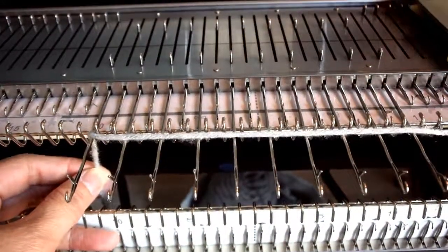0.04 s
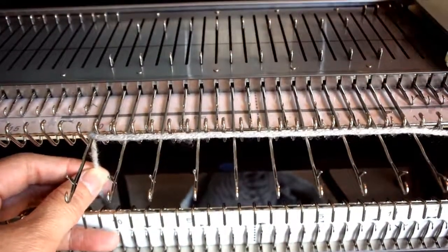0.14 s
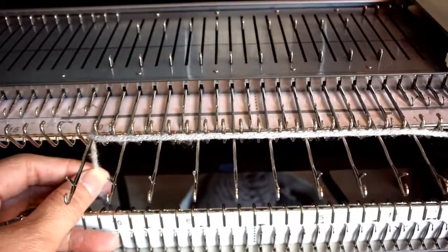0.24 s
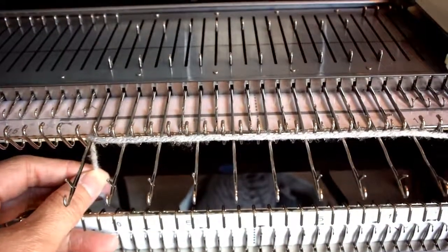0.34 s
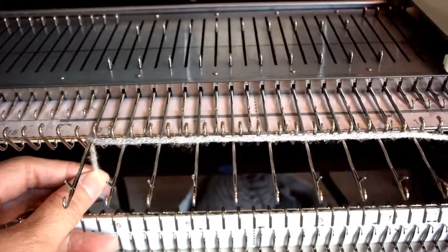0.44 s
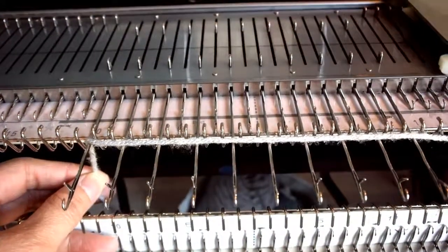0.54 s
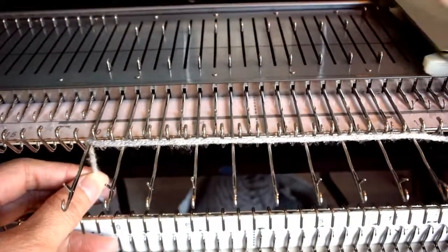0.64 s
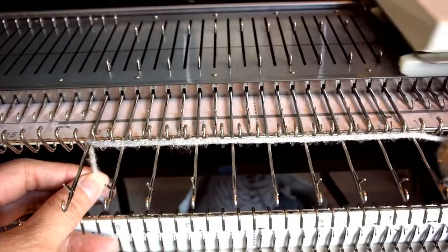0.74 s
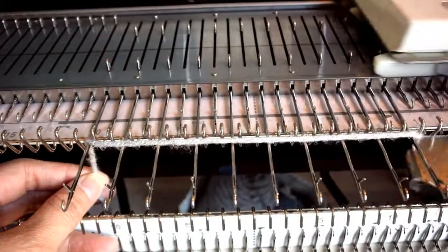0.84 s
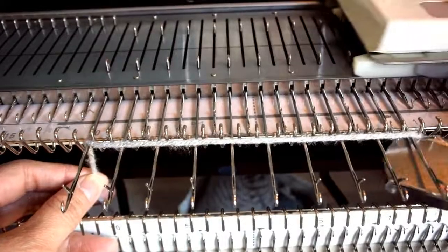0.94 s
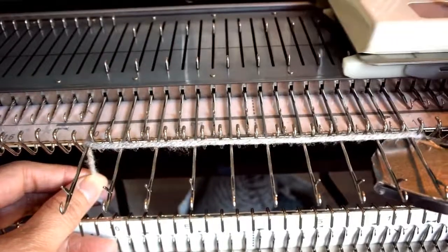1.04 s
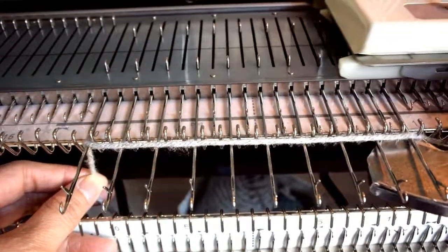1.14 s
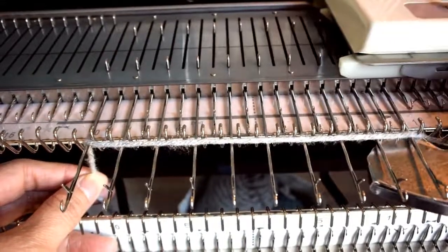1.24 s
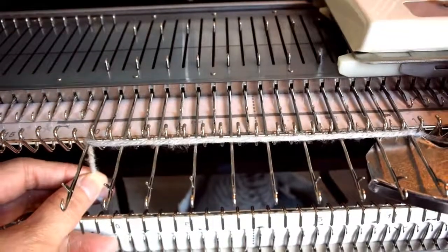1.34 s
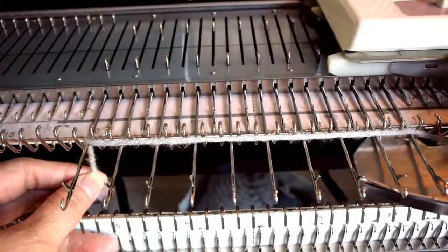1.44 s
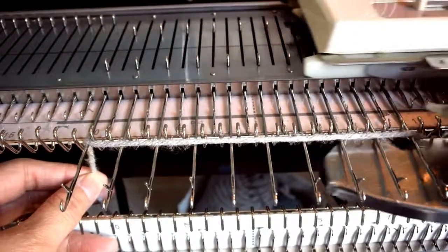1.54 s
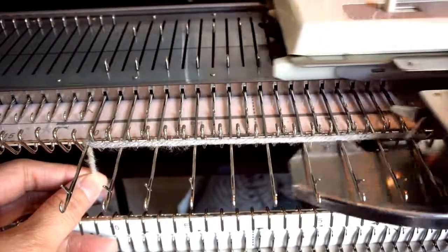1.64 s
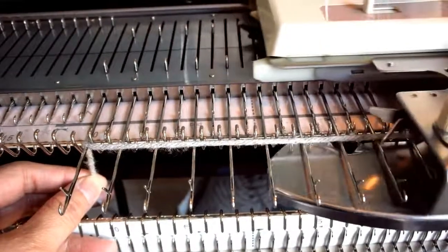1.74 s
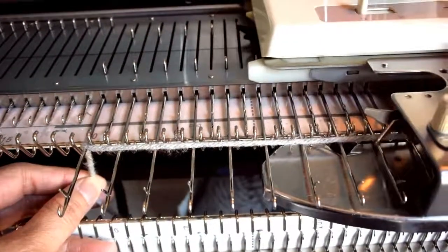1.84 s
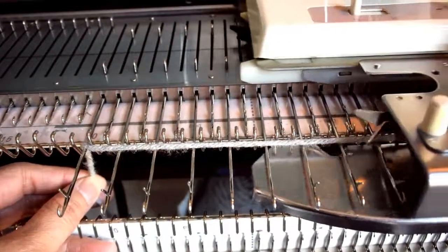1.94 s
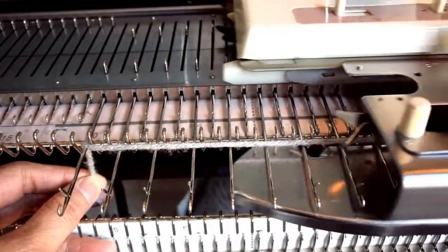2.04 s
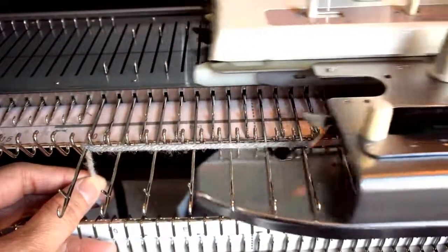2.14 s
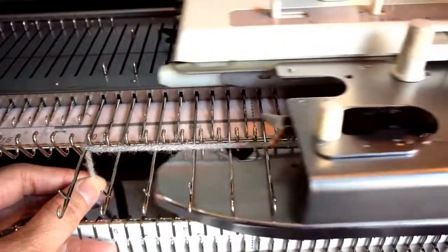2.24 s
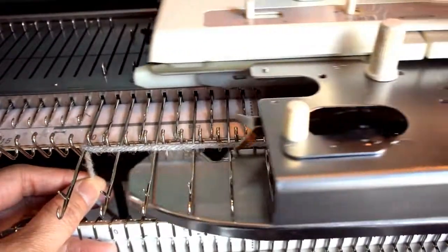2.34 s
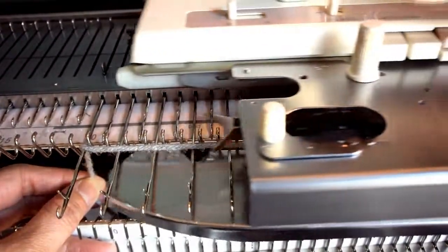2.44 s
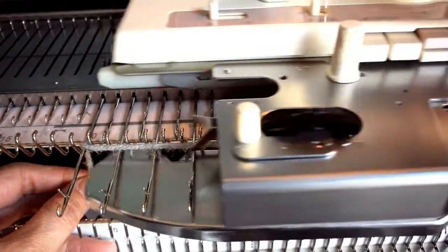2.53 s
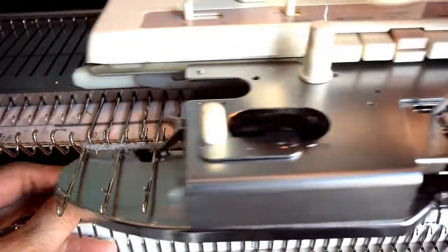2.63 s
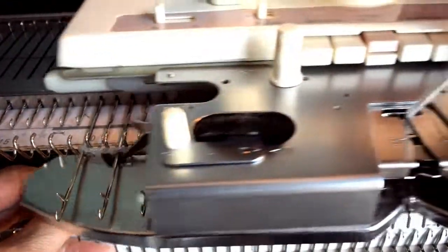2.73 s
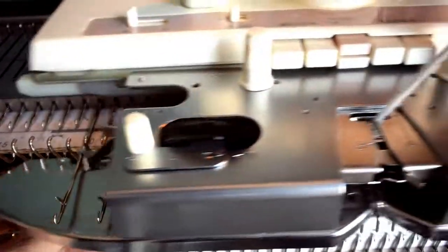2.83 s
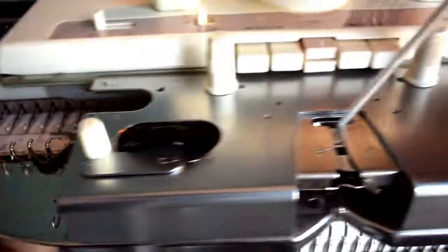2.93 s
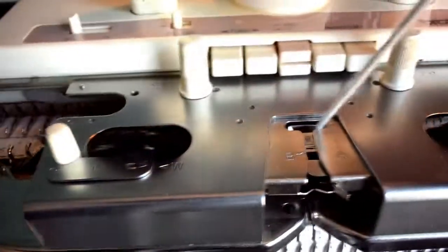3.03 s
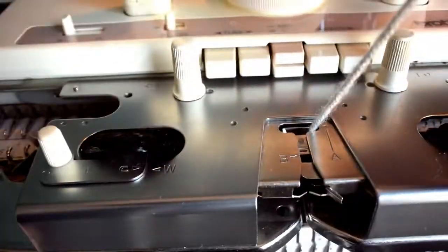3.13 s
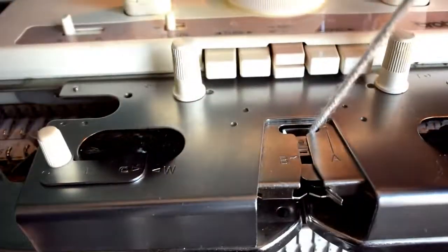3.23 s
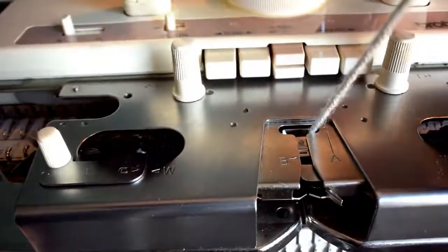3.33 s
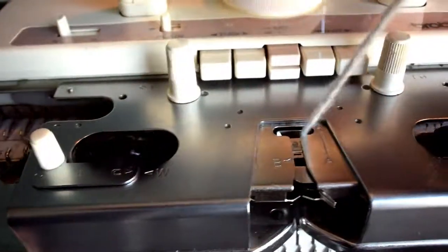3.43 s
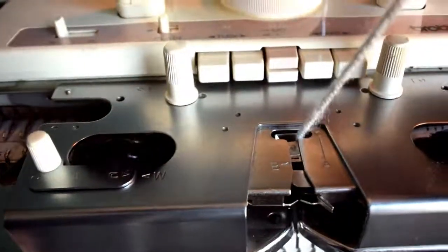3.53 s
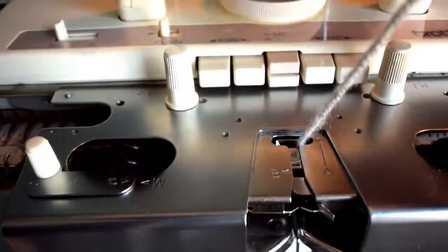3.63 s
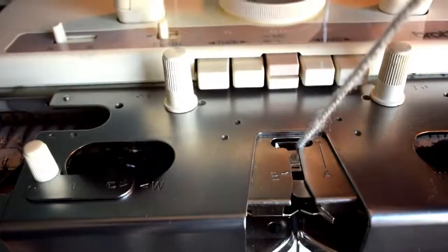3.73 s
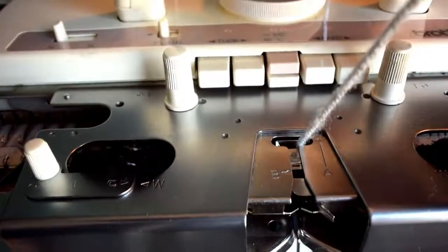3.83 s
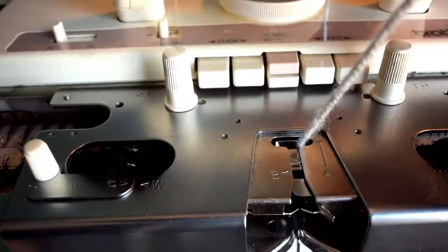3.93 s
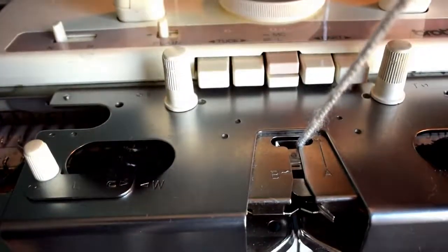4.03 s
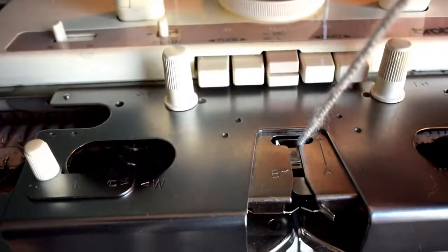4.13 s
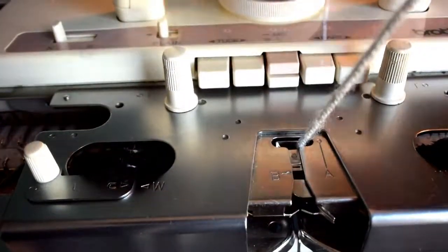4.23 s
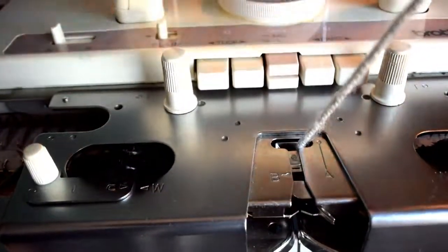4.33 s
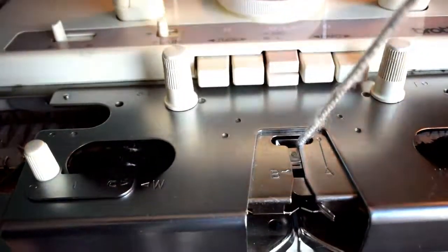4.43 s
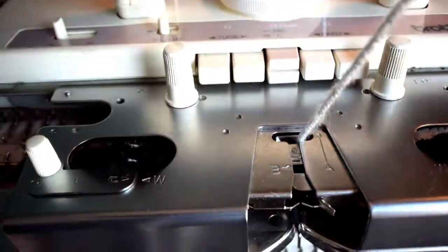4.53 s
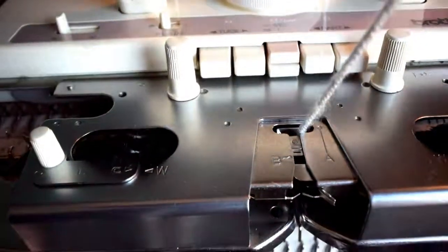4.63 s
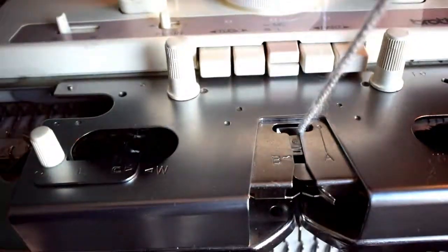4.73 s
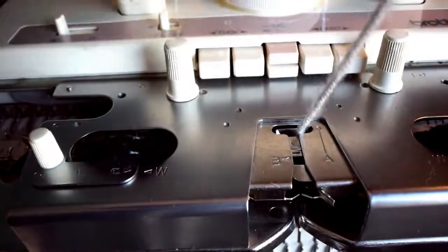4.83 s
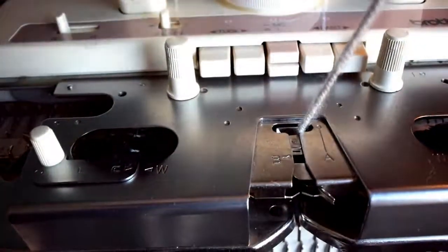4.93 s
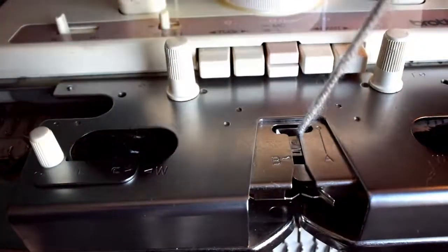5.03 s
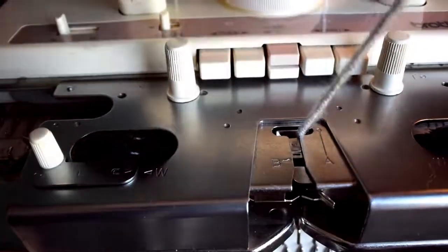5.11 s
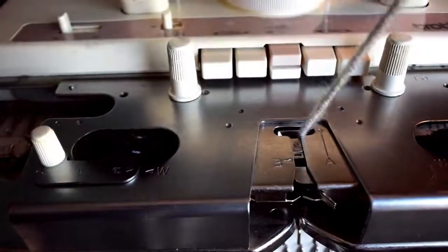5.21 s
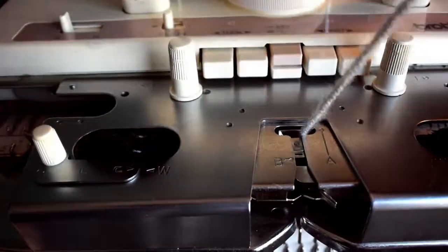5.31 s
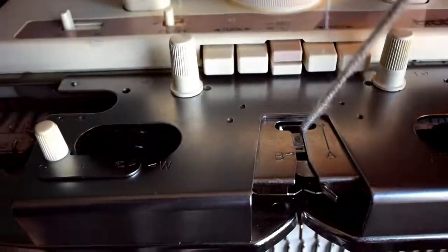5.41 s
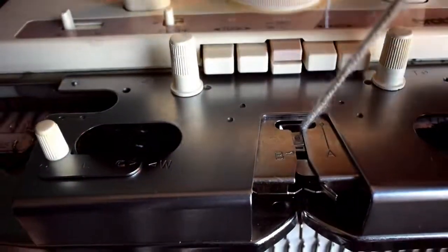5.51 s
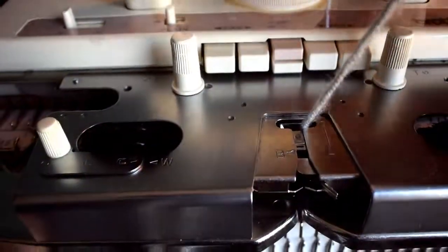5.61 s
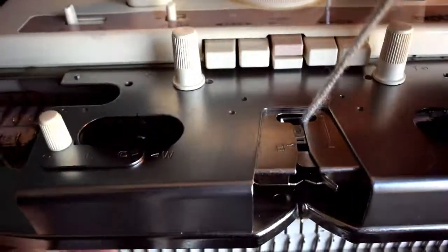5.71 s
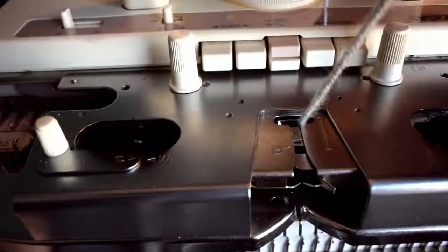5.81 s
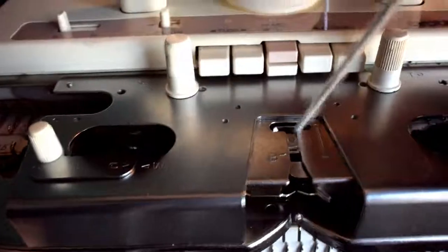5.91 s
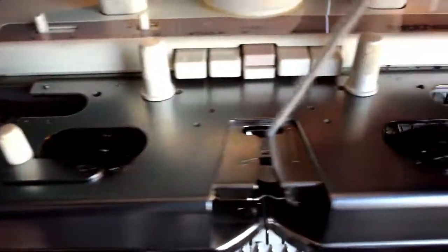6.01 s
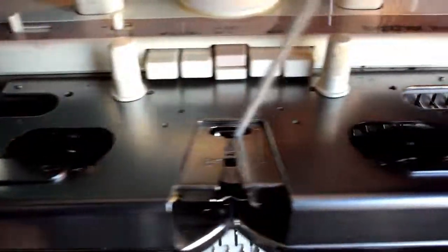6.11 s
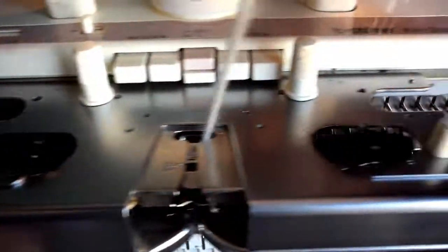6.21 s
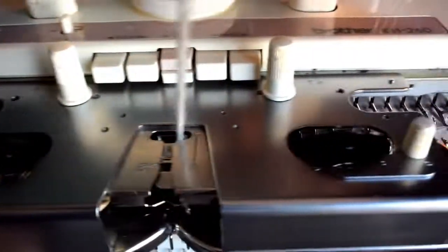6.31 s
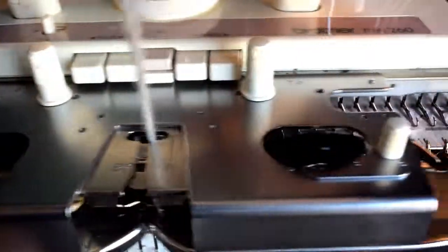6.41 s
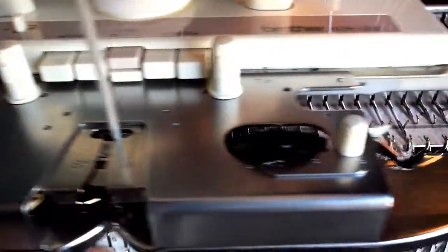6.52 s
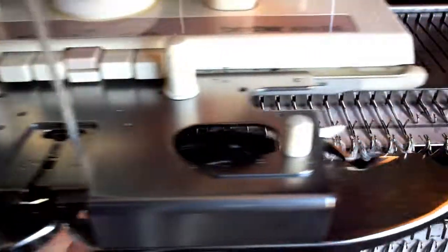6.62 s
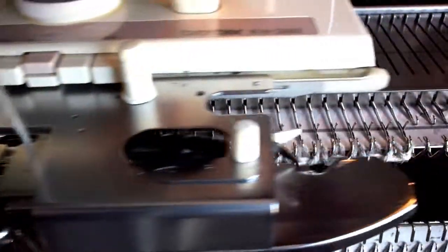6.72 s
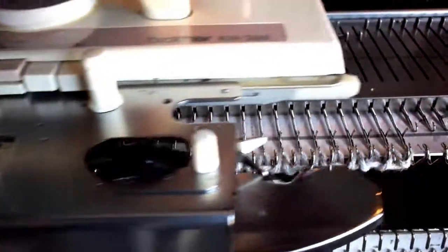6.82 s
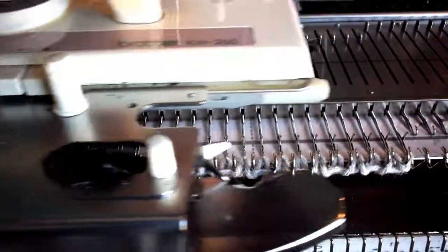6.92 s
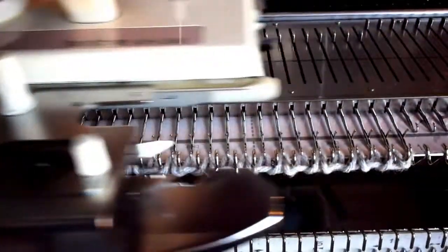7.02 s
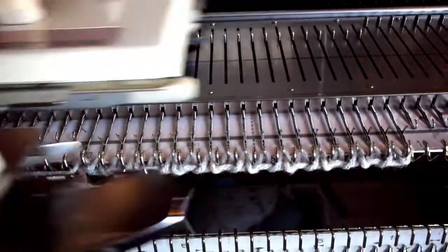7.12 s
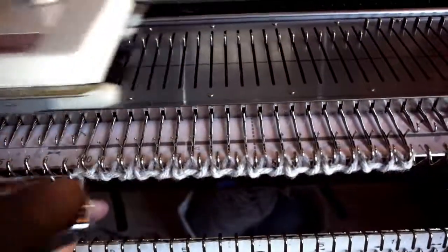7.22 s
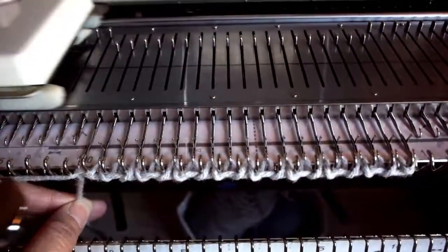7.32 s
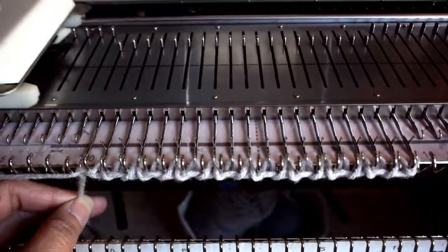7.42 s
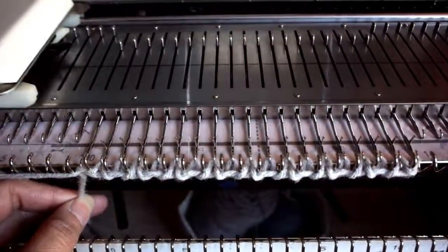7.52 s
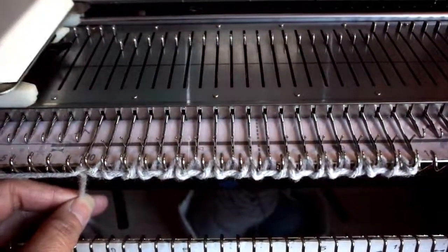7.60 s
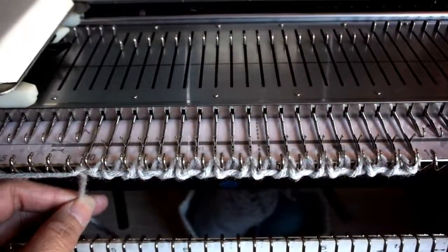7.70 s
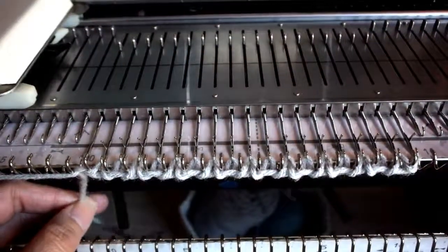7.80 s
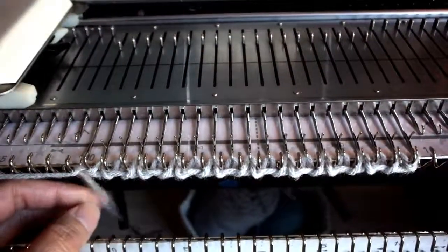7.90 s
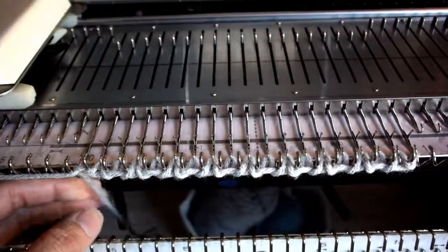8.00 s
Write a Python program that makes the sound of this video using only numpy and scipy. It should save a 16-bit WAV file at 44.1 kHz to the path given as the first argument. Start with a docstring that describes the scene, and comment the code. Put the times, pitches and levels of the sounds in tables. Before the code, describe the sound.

Close up in a small room, a knitting machine carriage starts with a few faint cam clicks and short shoves, then rattles along the steel bed, needles snapping rapidly. It stops; soft handle knocks, a thin ringing yarn rub and a tiny spring buzz follow. A small shove, then a louder, faster clattering pass back, ending in sharp clacks and faint room noise.

```python
"""Close stereo pair on a hand-pushed knitting machine in a small room, over faint steady room noise.
Cam clicks and short shoves lead to a long pass along the steel bed: needles snap through the cams as
bursts of noise with ringing partials, over latch rattle and rail rumble made from many tiny impacts.
The carriage rests: soft knocks ring damped handle modes, yarn rubs a wire as resonant noise, then a spring
buzzes. After one more shove the carriage is pulled back, snapping and clacking, and room noise remains."""
import sys
import numpy as np
from scipy import signal
from scipy.fft import rfft, irfft, next_fast_len
from scipy.io import wavfile

SR = 44100
rng = np.random.default_rng(int(sys.argv[2]) if len(sys.argv) > 2 else 0)


def store_wav(level_fs):
    """Save 16-bit WAV to argv[1]."""
    pcm = np.round(np.clip(np.atleast_2d(level_fs), -1, 1) * 32767)
    wavfile.write(sys.argv[1], SR, pcm.T.astype(np.int16))


N = 355225

# overall colour of the steel machine: [f/Hz, relative level per Hz/dB]
STEEL_COLOUR = [(30, -42), (70, -20), (125, -28), (220, -18.5), (450, -5), (650, -8), (1050, -3.5),
                (2000, -0.5), (2800, -2.5), (3700, -5), (5500, -9.5), (8300, -14), (10000, -29),
                (15500, -40.5)]
# resonances of bed and carriage: [f/Hz, width/Hz, lift/dB]
BED_RESONANCES = [(143.7, 19.6, 15.5), (296.6, 11, 8), (342.5, 5.3, 12.5), (398, 29, -6.5), (467, 23, 2.5),
                  (522, 26, 1.5), (715, 20, 11), (926, 160, 5), (1179, 20, 4.5), (1360, 17, 4),
                  (1574, 340, -2), (2970, 21, 4.5), (3400, 13, -8), (6220, 68, 6.5)]
# a needle butt rides up a cam and rings it: [t/s, relative level/dB, chatter decay/s]
CAM_HITS = [(0.0318, -41, 0.0097), (0.6007, -33.5, 0.021), (0.6864, -32.5, 0.0077), (0.7525, -29.5, .008),
            (0.8123, -29.5, 0.011), (.8749, -29.5, .006), (0.9509, -32.5, 0.0057), (1.115, -41, 0.01),
            (1.49, -31, 0.0087), (1.5548, -28.5, 0.0073), (1.6073, -27.5, 0.0046), (1.7271, -29.5, 0.0037),
            (2.0515, -29.5, 0.0062), (5.7353, -30.5, 0.001), (5.7442, -34.5, 0.0018),
            (5.7525, -28, 0.00064), (5.8166, -27, 0.00071), (5.843, -38, 0.0013), (5.8644, -23.5, 0.00067),
            (5.873, -34, .001), (7.068, -18, 0.0027), (7.089, -22.5, 0.0018), (7.128, -22, .002),
            (7.1704, -19.5, 0.0019), (7.2124, -16.5, 0.0015), (7.2585, -20.5, 0.0026),
            (7.2859, -31, 0.0054), (7.319, -26, .005), (7.3548, -22.5, .005), (7.412, -26.5, .007)]
# the long passes, out and back: [t/s, push level/dB, share of the cams filled with needles 0-1]
OUTWARD_PASS = [(2.1, -51, 0.46), (2.14, -41.5, 0.94), (2.28, -36.5, 0.87), (2.44, -41, 0.83),
                (2.55, -36, 0.9), (2.92, -35.5, 0.96), (3.02, -35.5, 0.89), (3.14, -61.5, 1),
                (3.3, -97, 0.5)]
RETURN_PASS = [(5.935, -51, 0.57), (5.979, -35.5, 0.85), (6.24, -39, 1), (6.376, -42.5, 0.62),
               (6.41, -34.5, 0.8), (6.96, -33.5, 0.73), (7.03, -39.5, 0.76), (7.22, -34.5, 0.077),
               (7.43, -46, .05), (7.64, -83, .03)]


def amp(db):
    """Decibels to gain."""
    return 10 ** (np.asarray(db) / 20)


def unit(x):
    """Scales to rms 1."""
    return x / np.sqrt(np.mean(x ** 2) + 1e-20)


def read(points, hz):
    """Reads a table along a log-frequency axis."""
    f, value = np.transpose(points)
    return np.interp(np.log(hz + 1), np.log(f), value)


def add(mix, s, sound):
    """Mixes a sound in at time s."""
    part = mix[:, round(s * SR):][:, :sound.shape[-1]]
    part += sound[..., :part.shape[-1]]


def colour(x, points, resonances=(), size=8192):
    """Causal (minimum-phase) filter: a smooth spectrum with narrow resonances standing on it."""
    hz = np.fft.rfftfreq(size, 1 / SR)
    db = read(points, hz)
    for f, width, lift in resonances:
        db = db + lift / (1 + (2 * (hz - f) / width) ** 2)
    log_gain = np.log(amp(np.r_[db, db[-2:0:-1]]))
    kernel = np.fft.ifft(np.exp(np.conj(signal.hilbert(log_gain)))).real
    kernel /= np.linalg.norm(kernel)
    return signal.oaconvolve(x, kernel[None], axes=1)[:, :x.shape[1]]


def split(x, low_hz, high_hz):
    """Bass, middle and treble of a sound."""
    bands = [(low_hz, "low"), ([low_hz, high_hz], "band"), (high_hz, "high")]
    return [signal.sosfilt(signal.butter(6, edge, kind, fs=SR, output="sos"), x) for edge, kind in bands]


def level(rows):
    """Gain over time from a dB curve, silent outside it."""
    s, db = np.transpose(rows)
    return amp(np.interp(np.arange(N) / SR, s, db, left=-np.inf, right=-np.inf))


def after(times, decay):
    """Jumps to 1 at each of the times and dies away with the decay in seconds."""
    kicks = np.bincount(np.round(np.array(times) * SR).astype(int), minlength=N)[:N]
    trail = signal.lfilter([1], [1, -np.exp(-1 / (decay * SR))], kicks + 1e-12)
    return np.minimum(trail, 1)


def room(x, wet_db, gap=0.0035, turns_per_s=2.3, count=3):
    """Sparse reflections begin after a gap (s); each band dies at its own speed and the tails take turns."""
    # decay of the small room: [f/Hz, t60/s]
    room_decay = [(120, 0.37), (320, 1), (840, 0.66), (2200, 0.41), (5800, 0.31), (14000, 0.41)]
    reflections_per_s = 4000
    out = x
    for k in range(count):
        present = rng.random((2, SR // 2)) < reflections_per_s / SR
        taps = rng.choice([-1., 1.], (2, SR // 2)) * present
        hz, t, z = signal.stft(taps, SR, nperseg=256)
        fade = amp(-60 * t / read(room_decay, hz)[:, None])
        tail = signal.istft(z * fade, SR, nperseg=256)[1]
        tail *= np.arange(tail.shape[1]) > gap * SR
        tail /= np.linalg.norm(tail[0])
        # staggered cosines keep the summed power of the tails steady
        share = np.sqrt(2 / count) * np.cos(np.pi * (2 * turns_per_s * np.arange(N) / SR + k / count))
        out = out + amp(wet_db) * signal.oaconvolve(x * share, tail, axes=1)[:, :N]
    return out


def struck(hits, modes, gain_db, rise, wet_db):
    """Every blow rings the same damped modes, in fresh phases, with a short rise (s)."""
    out, t = np.zeros((2, N)), np.arange(SR // 5) / SR
    rings = np.array([amp(db - 60 * t / t60) * np.exp(2j * np.pi * hz * t) for hz, db, t60 in modes])
    rings = rings * (1 - np.exp(-t / rise))
    for s, db in hits:
        phases = np.exp(2j * np.pi * rng.random((len(modes), 2, 1)))
        add(out, s, amp(db + gain_db) * (phases * rings[:, None]).imag.sum(0))
    return room(out, wet_db, count=2)


def room_noise():
    """Steady faint background from coloured noise, wider in the treble than in the bass."""
    # colour of the room noise: [f/Hz, relative level per Hz/dB]
    quiet_colour = [(15, -33), (25, -5), (91, -16.5), (122, -1.5), (148, -13.5), (233, -4.5), (378, -5.5),
                    (495, -6), (552, -7), (848, -5.5), (970, -9.5), (1300, -3.5), (1490, -8.5),
                    (5580, -14.5), (15500, -41)]
    # its stereo spread: [f/Hz, side over mid level/dB]
    quiet_width = [(60, -10), (400, -3.5), (1300, -3), (4400, -1)]
    quiet_db = -55.5
    size = next_fast_len(N)
    noise = unit(colour(rng.standard_normal((2, N)), quiet_colour))
    mid, side = rfft(amp(quiet_db) * noise, size)
    side = side * amp(read(quiet_width, np.fft.rfftfreq(size, 1 / SR)))
    return irfft(np.array([mid + side, mid - side]), size)[:, :N]


def cam_rings():
    """Needle butts riding up the cams excite damped modes of the cam metal."""
    # what the cams ring with: [f/Hz, relative level/dB, t60/s]
    cam_modes = [(2500, -5, 0.13), (2693, 1, 0.11), (2875, -1, 0.14), (3050, -2, .11), (3230, -7, 0.088)]
    hits = [(s, db) for s, db, _ in CAM_HITS]
    return struck(hits, cam_modes, gain_db=-14.5, rise=0.0005, wet_db=-6)


def blows(push_db, filled):
    """All blows (s, plates dB, cams dB, tick dB, decay s): loud ones and a loose train of lesser needles."""
    # the loudest bright snaps of needles springing free: [t/s, relative level/dB, chatter decay/s]
    snaps = [(.7046, -41.5, 0.003), (.834, -49, .004), (.9737, -45, 0.0026), (1.5646, -28.5, 0.005),
             (1.6601, -24.5, 0.008), (1.9497, -37.5, .007), (2.1181, -25, .007), (2.1613, -16.5, .007),
             (2.2315, -19, 0.0066), (2.252, -23, 0.005), (2.3096, -19.5, 0.0046), (2.3378, -30, 0.0053),
             (2.4663, -22.5, 0.0055), (2.5776, -19.5, 0.0039), (2.6432, -17, .006), (2.702, -21, 0.003),
             (2.7658, -20.5, 0.01), (2.829, -21, 0.011), (2.854, -21, 0.0047), (2.8839, -20, .006),
             (2.935, -20, 0.0042), (2.996, -23.5, 0.0046), (3.0939, -21, 0.0042), (3.4535, -24.5, 0.0035),
             (3.4848, -21.5, 0.011), (4.1595, -54, .003), (5.5075, -43.5, 0.023), (5.6339, -30, 0.0012),
             (5.785, -33.5, 0.0012), (5.8849, -30.5, .004), (5.9802, -20.5, 0.011), (6.0011, -19, 0.003),
             (6.0463, -20, 0.017), (6.0703, -18, 0.034), (6.1295, -19, 0.0028), (6.1692, -16.5, 0.018),
             (6.1909, -18, 0.0026), (6.249, -20.5, 0.0035), (6.296, -24, .009), (6.3153, -18, 0.0017),
             (6.399, -18.5, 0.008), (6.4239, -20, 0.0079), (6.4658, -18, 0.0047), (6.514, -18.5, 0.0096),
             (6.5754, -18, 0.0066), (6.6559, -20, .01), (6.707, -24, 0.0047), (6.758, -24.5, 0.0041),
             (6.7933, -19.5, 0.0049), (6.8176, -19.5, 0.0021), (6.879, -16.5, 0.012), (6.9338, -21, 0.0016),
             (6.9862, -13, 0.0011), (7.0458, -29, .004), (7.0776, -23.5, 0.0043), (7.15, -17, .004),
             (7.3745, -31.5, 0.0033), (7.4509, -35.5, 0.00052)]
    # the carriage jolts in its play and its plates clack: [t/s, relative level/dB]
    clacks = [(1.4177, -40), (1.6783, -29), (1.9875, -32.5), (2.8925, -24), (4.1362, -42), (5.686, -33),
              (5.9677, -17.5), (6.1, -16.5), (6.216, -18.5), (6.5144, -21), (6.6025, -19), (6.6821, -20),
              (6.9735, -21.5), (7.1071, -23), (7.202, -18)]
    # what full cams add to the lesser needles: [plates level/dB, cams level/dB, bright tick level/dB]
    filled_voice = (2.5, 2, 13)
    # what each kind of blow shakes, in the same three columns
    cam_voice, snap_voice, clack_voice = (-10.5, -0.46, -15.5), (-12.5, -2.5, 0), (0, -3, -5)
    lesser_voice = (0, 3.6, -2.5)  # against the push, with empty cams
    clack_decay_s, lesser_decay_s = 0.008, 0.0035
    needles_per_s, jitter = 33, 0.22  # jitter as a share of the spacing
    spread_db = 4  # scatter of strength and colour

    timed_clacks = [(s, db, clack_decay_s) for s, db in clacks]
    kinds = [(CAM_HITS, cam_voice), (snaps, snap_voice), (timed_clacks, clack_voice)]
    rows = [(s, *(db + np.array(voice)), decay) for table, voice in kinds for s, db, decay in table]
    for curve in (OUTWARD_PASS, RETURN_PASS):
        times = np.arange(curve[0][0], curve[-1][0], 1 / needles_per_s)
        for s, (late, *uneven) in zip(times, rng.standard_normal((len(times), 4))):
            s = s + late * jitter / needles_per_s
            at = round(s * SR)
            voice = np.array(lesser_voice) + filled[at] * np.array(filled_voice)
            voice = voice + spread_db * np.array(uneven)
            rows.append((s, *(push_db[at] + voice), lesser_decay_s))
    return rows


def needles(hits, clack_db=4, cam_db=1.0, tick_db=4, plate_decay=0.0093, ring_decay=0.019, order=12):
    """Each blow is a burst of chatter through plates, cams and tick, plus a few ringing partials of its own."""
    out, t = np.zeros((2, N)), np.arange(SR // 14) / SR
    span, ring_db = 0.008, -18.5  # span (s) sets the energy of a burst
    chatter = np.array(split(rng.standard_normal((2, N)), low_hz=2160, high_hz=3703))
    for s, clack, cam, tick, decay in hits:
        low, middle, high = chatter[:, :, rng.integers(N - len(t)):][:, :, :len(t)]
        # a blow's energy is packed into one sharp snap or spread over a longer chatter
        snap, thud = (np.sqrt(2 * span / d) * np.exp(-t / d) for d in (decay, decay + plate_decay))
        hz = np.exp(rng.uniform(np.log(800), np.log(9000), order))
        ring_level = ring_db + read([(1500, clack), (2800, cam), (4500, tick)], hz)
        sizes = amp(ring_level) * rng.choice([-1, 1], (2, order))
        ring = sizes @ np.sin(2 * np.pi * hz[:, None] * t) * np.exp(-t / ring_decay)
        plate_part = amp(clack + clack_db) * low * thud
        bright_part = (amp(cam + cam_db) * middle + amp(tick + tick_db) * high) * snap
        add(out, s, plate_part + bright_part + ring)
    return room(colour(out, STEEL_COLOUR, BED_RESONANCES), wet_db=-6)


def motion():
    """How hard the hand pushes (dB) and how full the cams are (0-1), sample by sample."""
    # short shoves before and after the passes: [t/s, length/s, push level/dB, share of the cams filled 0-1]
    shoves = [(0.607, .37, -51, 0.3), (1.504, 0.22, -43.5, 0.44), (1.926, 0.21, -51.5, 0.9),
              (3.39, 0.13, -44, 0.8), (4.106, 0.15, -51, 0.35), (5.645, 0.23, -47, 0.4)]
    attack_s, release_db_per_s = 0.063, 201
    slip_db, slip_s = 3.5, 0.057  # the carriage lurches on after each cam click
    t = np.arange(N) / SR
    strokes = []
    for curve in (OUTWARD_PASS, RETURN_PASS):
        s, db, share = np.transpose(curve)
        push = np.interp(t, s, db, left=-np.inf, right=-np.inf)
        strokes.append((push, np.interp(t, s, share)))
    for start, length, db, share in shoves:
        attack = 20 * np.log10(np.clip((t - start) / attack_s, 1e-9, 1))
        release = release_db_per_s * np.maximum(t - start - length, 0)
        strokes.append((db + attack - release, np.full(N, share)))
    push_db, filled = np.array(strokes).transpose(1, 0, 2)
    # the firmest stroke rules at each moment
    filled = np.clip(filled[push_db.argmax(0), np.arange(N)], 0, 1)
    slips = after([s for s, _, _ in CAM_HITS], slip_s)
    return push_db.max(0) + slip_db * slips, filled


def latches(per_s=1000, spread_db=4.5, decay=0.00091, slide_db=-14):
    """Many tiny impacts of latches and sinkers, a few of them large, over the hiss of sliding."""
    sizes = amp(spread_db * np.minimum(rng.exponential(1, N), 3)) * (rng.random(N) < per_s / SR)
    # each impact dies in about a millisecond
    energy = signal.lfilter([1], [1, -np.exp(-2 / (decay * SR))], sizes ** 2)
    envelope = np.sqrt(energy / energy.mean() + amp(slide_db) ** 2)
    return envelope * rng.standard_normal((2, N))


def carriage(push_db, filled, jolt_db, shell_db=1, deep_db=-10):
    """Tiny impacts ring rail, shell, plates and latches with the push; full cams make them brighter."""
    # where the carriage is: [t/s, place on the bed, 0 at the right end to 1 at the left]
    place = [(.6, 0.054), (1.9, 0.12), (3.1, 0.49), (5.95, 0.79), (6.4, 0.92), (7.3, 0)]
    rumble_base_db, rumble_travel_db = -38, -17.5  # firm push at the right end; change across the bed
    firm_push_db, rumble_follow = -34, 0.58  # follow: dB of rumble for each dB of push
    clatter_db, clatter_filled_db = -2.5, 13  # against the push with empty cams; gain with full ones
    rattle_db, rattle_filled_db = -5, 19.5  # the same for the latch rattle
    shell_travel_db = -4  # the shell booms less as the carriage moves left

    shaking = room(colour(latches(), STEEL_COLOUR, BED_RESONANCES), wet_db=-1.5)
    deep, rumble, _ = split(shaking, low_hz=80, high_hz=270)
    _, shell, _ = split(shaking, low_hz=266, high_hz=675)
    _, clatter, rattle = split(shaking, low_hz=718, high_hz=1940)
    position = np.interp(np.arange(N) / SR, *np.transpose(place))
    rumble_db = rumble_base_db + rumble_follow * (push_db - firm_push_db) + rumble_travel_db * position
    parts = [(shell, shell_db + shell_travel_db * position),
             (clatter, clatter_db + clatter_filled_db * filled + jolt_db),
             (rattle, rattle_db + rattle_filled_db * filled + jolt_db)]
    rail = amp(rumble_db) * unit(rumble + amp(deep_db) * deep)
    return rail + sum(amp(push_db + db) * unit(part) for part, db in parts)


def plates(swell=0.0043):
    """A loose carriage plate swells (s) to its own pitch and dies at once."""
    # hollow knocks of the plates: [t/s, f/Hz, level at the swell's peak/dB]
    plate_knocks = [(0.925, 1300, -42), (1.42, 880, -41), (3.005, 1080, -22), (5.767, 900, -29),
                    (7.206, 960, -18)]
    out, t = np.zeros((2, N)), np.arange(SR // 10) / SR
    for s, hz, db in plate_knocks:
        envelope = amp(db) * t / swell * np.exp(1 - t / swell)
        add(out, s, envelope * np.sin(2 * np.pi * (hz * t + rng.random((2, 1)))))
    return room(out, wet_db=-24, count=2)


def scrape(width_hz=70):
    """Friction sounds one plate resonance, which glides as the point of contact moves."""
    # the sinker plate touches the first needles, then scrapes in over them: [t/s, f/Hz, level/dB]
    scrape_path = [(1.41, 880, -59), (1.425, 900, -49), (1.46, 1150, -49), (1.53, 1100, -75),
                   (1.96, 1100, -56), (2.006, 1067, -37), (2.035, 920, -40), (2.11, 994, -43.5),
                   (2.29, 1190, -32), (2.44, 1092, -49)]
    s, hz, db = np.transpose(scrape_path)
    turn = np.exp(2j * np.pi * np.cumsum(np.interp(np.arange(N) / SR, s, hz)) / SR)
    r = np.exp(-np.pi * width_hz / SR)
    noise = rng.standard_normal((2, N)) + 1j * rng.standard_normal((2, N))
    grip = signal.lfilter([1], np.poly([r, r]), noise)
    # turning the slow noise moves it up to the gliding pitch
    return level(np.c_[s, db]) * unit((turn * grip).real)


def handle_knocks():
    """Soft knocks ring the damped modes of the handle."""
    # the knocks: [t/s, relative level/dB]
    knock_times = [(3.914, -34), (4.071, -34), (4.139, -40), (4.245, -37)]
    # what they ring with: [f/Hz, relative level/dB, t60/s]
    handle_modes = [(332, -1, 0.053), (631, -1, 0.067), (770, -4, 0.032), (927, -4, 0.048),
                    (1365, -7, 0.036), (1443, -4, 0.056)]
    return struck(knock_times, handle_modes, gain_db=1, rise=0.00095, wet_db=-14.5)


def yarn():
    """Fine friction of the yarn, as noise, sets the tension wire ringing."""
    # yarn drawn over the tension wire: [t/s, relative level/dB]
    rub_level = [(4.62, -64), (4.78, -44), (4.85, -43), (4.96, -55), (5.09, -49.5), (5.22, -61)]
    # colour of the rub: [f/Hz, relative level per Hz/dB]
    rub_colour = [(120, -66), (200, -19), (447, -12.5), (723, -15.5), (1090, -8.5), (1320, -20),
                  (1540, -10.5), (2400, -18), (6940, -21), (12000, -44), (15600, -79), (22000, -120)]
    # resonances of the wire: [f/Hz, width/Hz, lift/dB]
    wire_resonances = [(456, 14, 20), (538, 13, 22), (877, 15, 18), (1086, 30, 12), (1500, 12, 24),
                       (1950, 40, 11)]
    rub = colour(rng.standard_normal((2, N)), rub_colour, wire_resonances)
    return level(rub_level) * unit(rub)


def spring(gain_db=2, decay=0.04):
    """The spring buzzes against its guide after each flick, exciting its resonances unevenly."""
    # the yarn tension spring is flicked and bounces: [t/s, relative level/dB]
    flicks = [(5.262, -39), (5.302, -54), (5.333, -56)]
    # colour of the buzz: [f/Hz, relative level per Hz/dB]
    spring_colour = [(200, -13), (1800, -5.5), (7000, -13), (10500, -21), (15500, -38)]
    # resonances of the spring: [f/Hz, width/Hz, lift/dB]
    spring_resonances = [(910, 70, 20), (1565, 120, 20), (1780, 67, 11), (1990, 190, 20), (4960, 170, 16),
                         (6400, 27, 17.5), (6700, 220, 13)]
    t = np.arange(N) / SR
    buzz = sum(amp(db) * (t > s) * np.exp(-abs(t - s) / decay) for s, db in flicks)
    return amp(gain_db) * colour(buzz * rng.standard_normal((2, N)), spring_colour, spring_resonances)


def microphones(mid_side):
    """Two close ports hear the bass alike and the treble differently."""
    # stereo spread: [f/Hz, gain of side over mid/dB]
    image_width = [(60, -17), (250, -24), (500, -20), (750, -16), (1400, -9), (2800, -5), (5600, -.6),
                   (12000, 0)]
    # stereo balance: [f/Hz, left over right level/dB]
    image_balance = [(600, 0), (1400, -.4), (2800, -1.2), (7000, -1.9), (14000, -1.2)]
    size = next_fast_len(N + 4096)
    hz = np.fft.rfftfreq(size, 1 / SR)
    mid, side = rfft(mid_side, size)
    side = side * amp(read(image_width, hz))
    lean = amp(read(image_balance, hz) / 2)  # half the balance on each channel
    return irfft(np.array([(mid + side) * lean, (mid - side) / lean]), size)[:, :N]


def scene():
    """The sources are made as mid and side, then heard by the microphone pair over the room noise."""
    push_db, filled = motion()
    hits = blows(push_db, filled)
    # every blow sets plates and latches rattling harder for a moment
    jolt_range_db, jolt_s = 3.5, 0.012
    jolt_db = jolt_range_db * (after([hit[0] for hit in hits], jolt_s) - 1)
    machine = cam_rings() + needles(hits) + carriage(push_db, filled, jolt_db) + plates() + scrape()
    pause = handle_knocks() + yarn() + spring()
    return room_noise() + microphones(machine + pause)


def record(dry):
    """The microphone dips between 9 and 14.5 kHz; the converter is slightly offset, clips and limits the band."""
    # microphone response: [f/Hz, gain/dB]
    response = [(0, 0), (9000, 0), (9900, -9), (10700, -2), (11600, -11), (13000, -6), (14500, 0), (SR / 2, 0)]
    offset, edge_hz = 0.0024, 15850  # offset as a share of full scale
    hz, db = np.transpose(response)
    heard = signal.oaconvolve(dry, signal.firwin2(255, hz, amp(db), fs=SR)[None], "same")
    clipped = np.clip(heard + offset, -1, 1)
    band_limit = signal.firwin(511, edge_hz, window=("kaiser", 9), fs=SR)
    return signal.oaconvolve(clipped, band_limit[None], "same")


dry = scene()
out = record(dry)
store_wav(out)
```